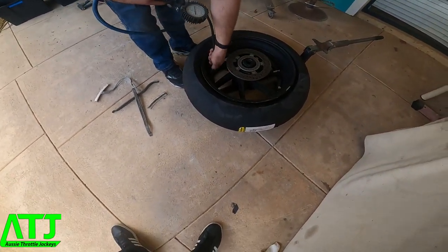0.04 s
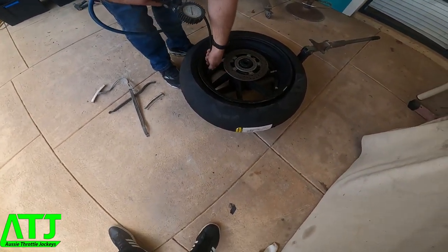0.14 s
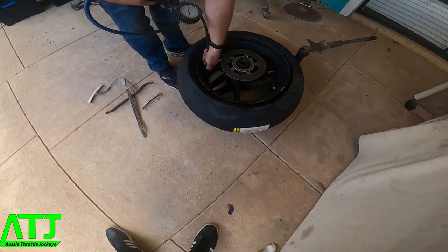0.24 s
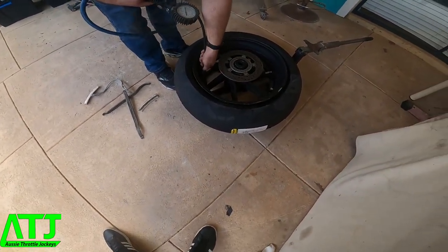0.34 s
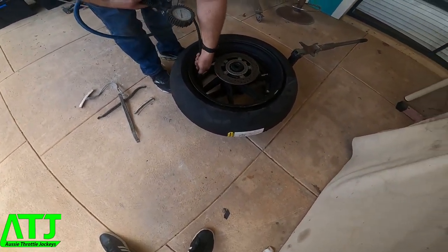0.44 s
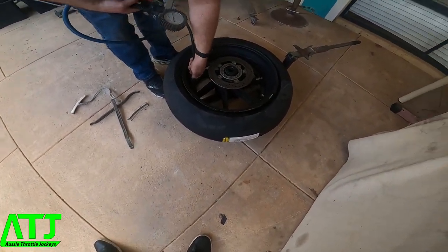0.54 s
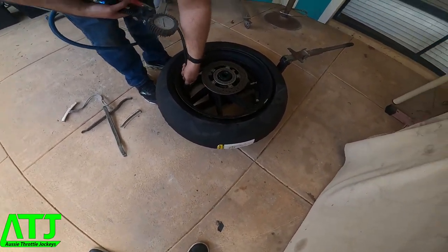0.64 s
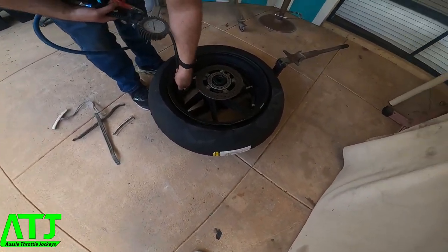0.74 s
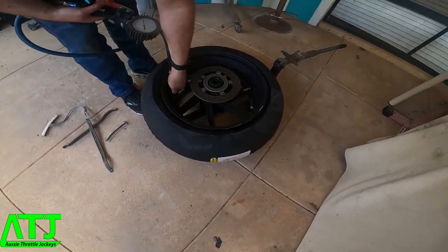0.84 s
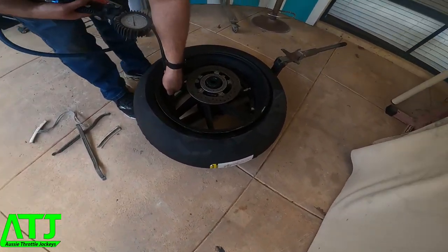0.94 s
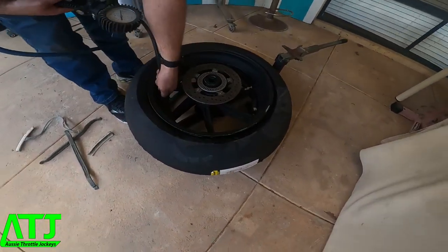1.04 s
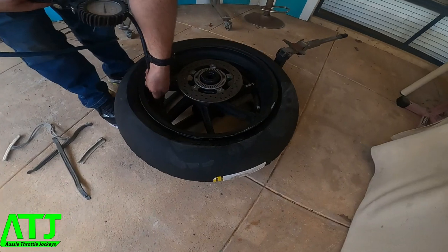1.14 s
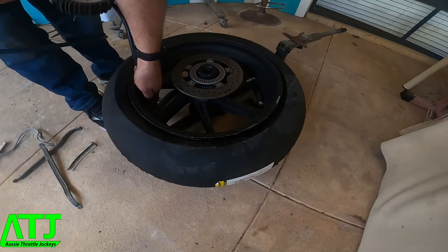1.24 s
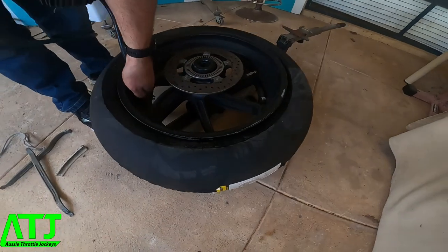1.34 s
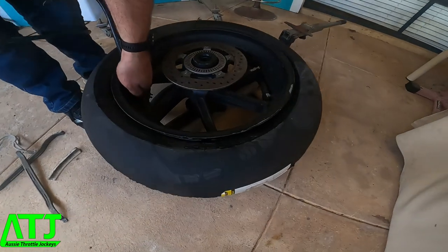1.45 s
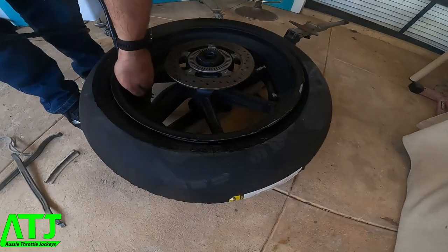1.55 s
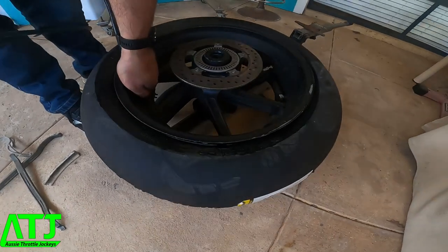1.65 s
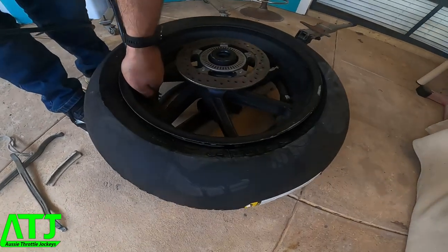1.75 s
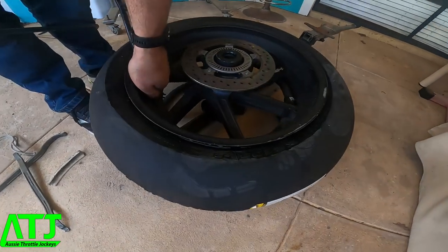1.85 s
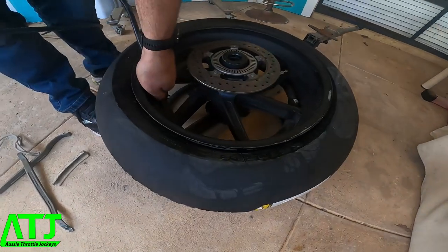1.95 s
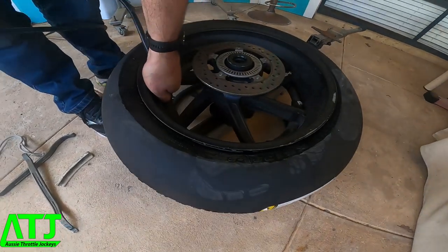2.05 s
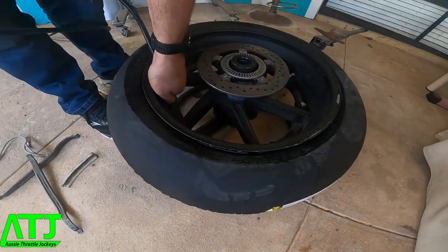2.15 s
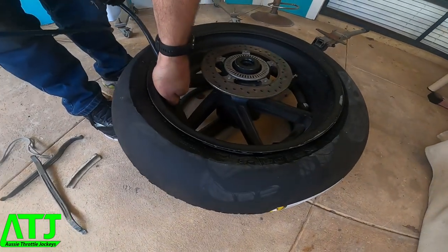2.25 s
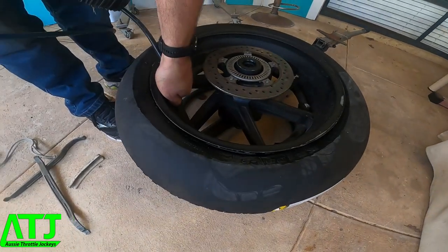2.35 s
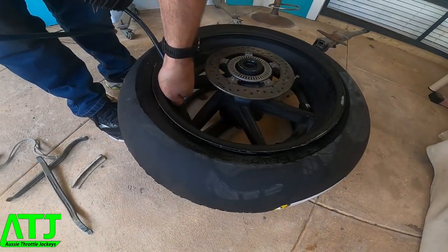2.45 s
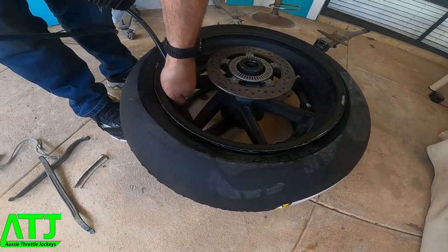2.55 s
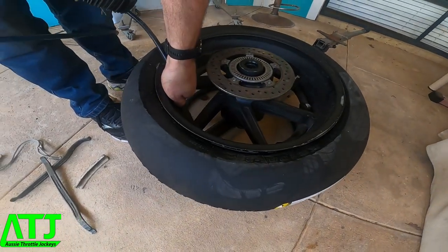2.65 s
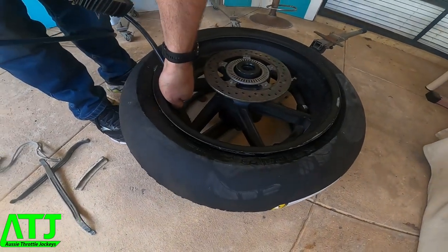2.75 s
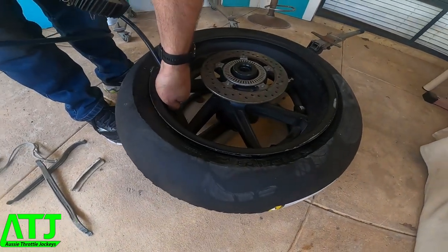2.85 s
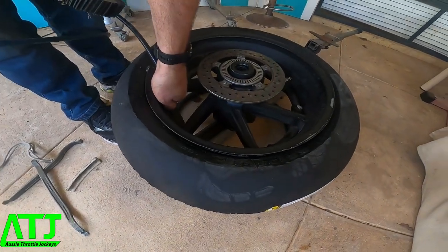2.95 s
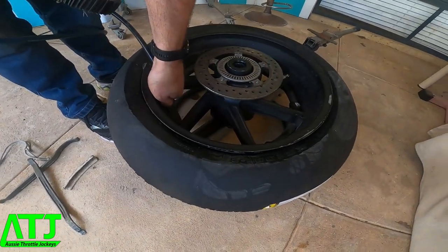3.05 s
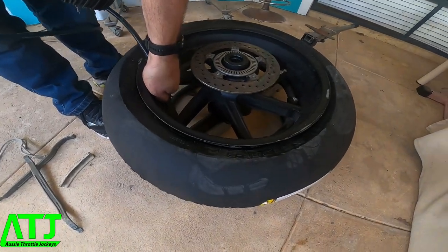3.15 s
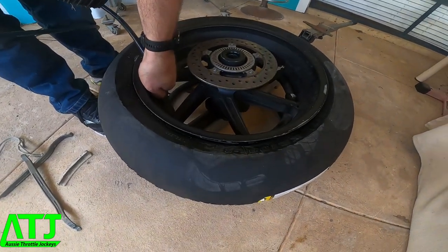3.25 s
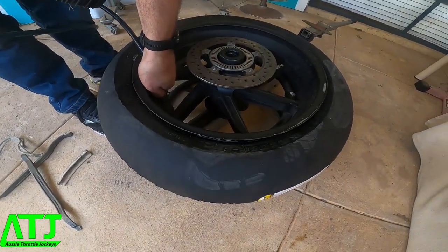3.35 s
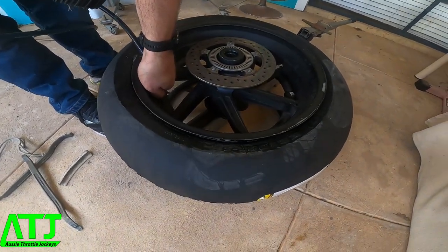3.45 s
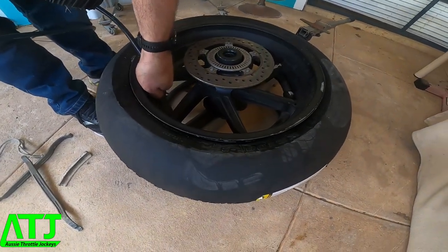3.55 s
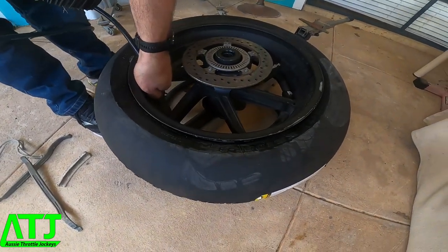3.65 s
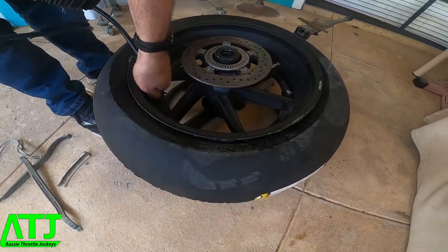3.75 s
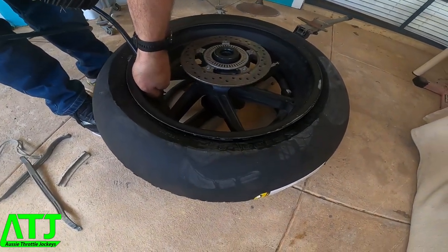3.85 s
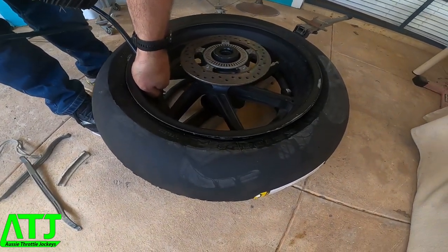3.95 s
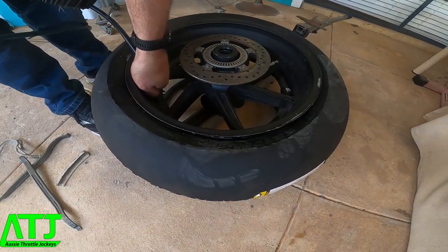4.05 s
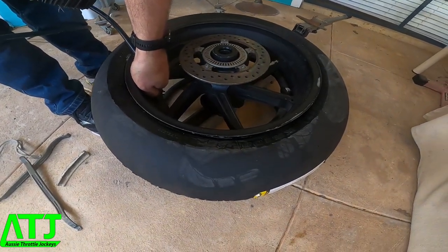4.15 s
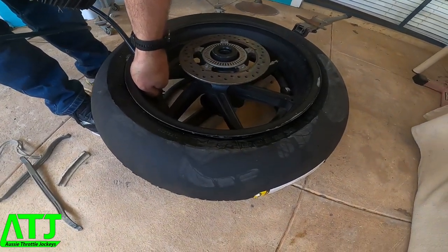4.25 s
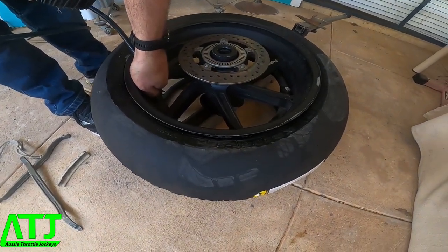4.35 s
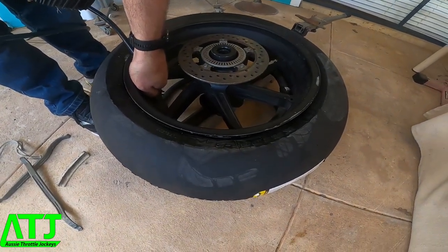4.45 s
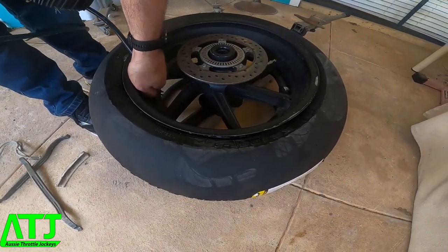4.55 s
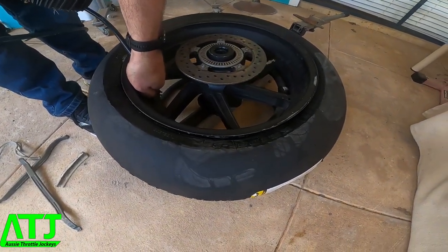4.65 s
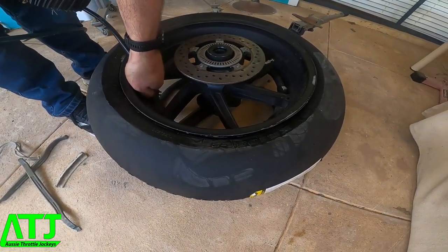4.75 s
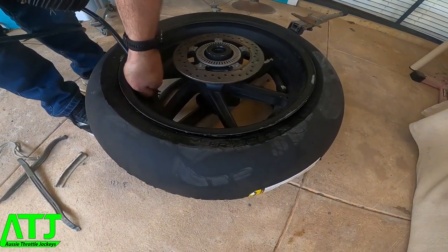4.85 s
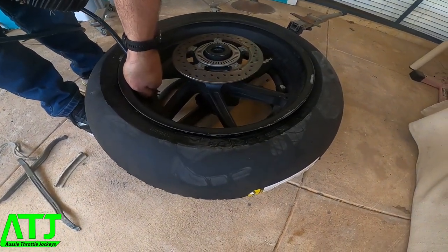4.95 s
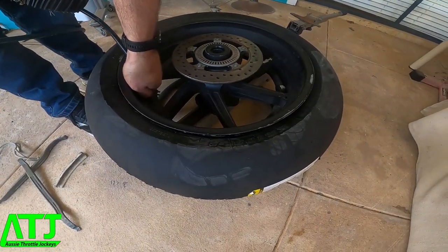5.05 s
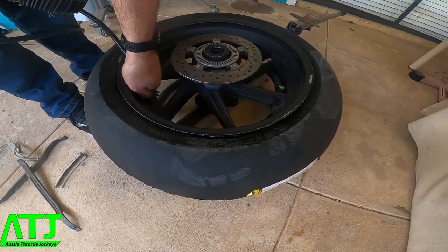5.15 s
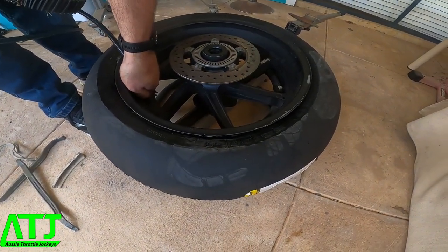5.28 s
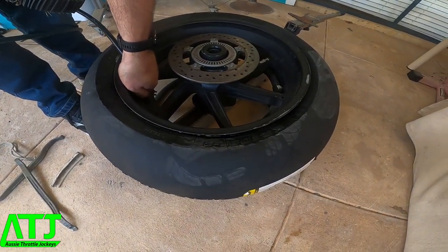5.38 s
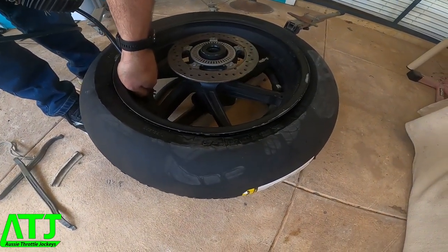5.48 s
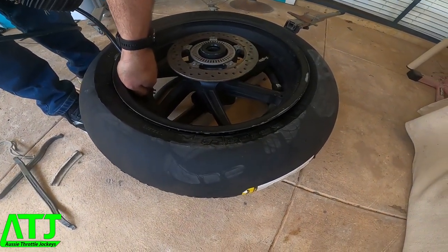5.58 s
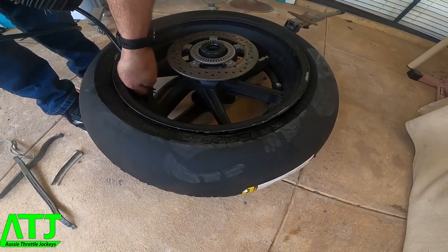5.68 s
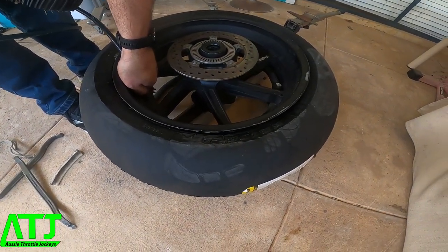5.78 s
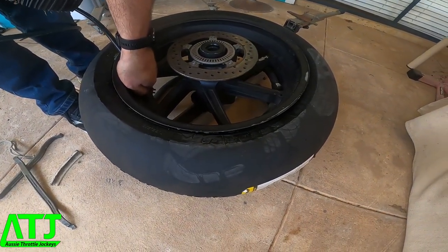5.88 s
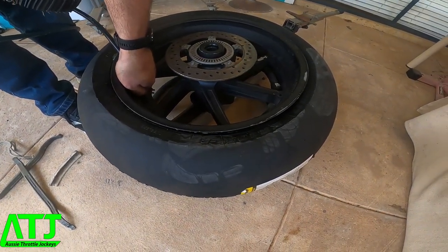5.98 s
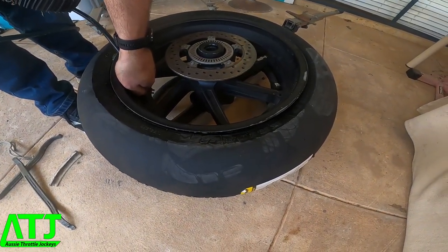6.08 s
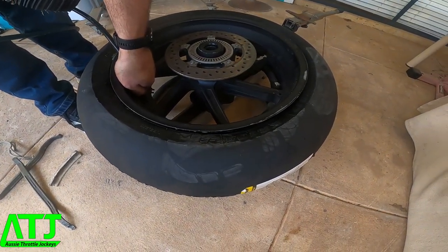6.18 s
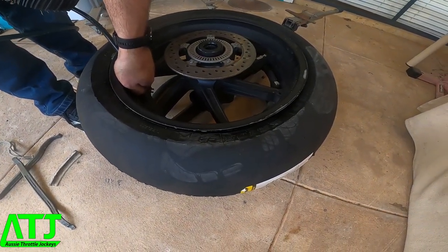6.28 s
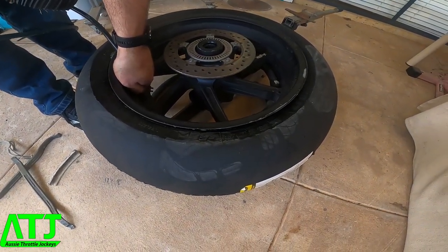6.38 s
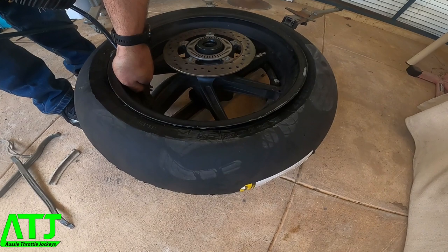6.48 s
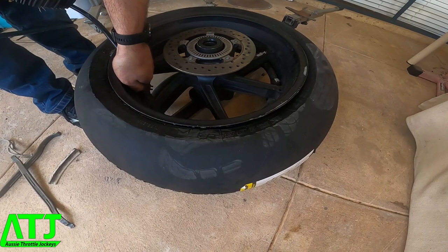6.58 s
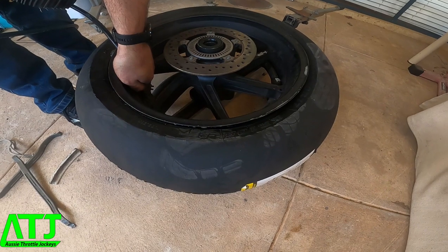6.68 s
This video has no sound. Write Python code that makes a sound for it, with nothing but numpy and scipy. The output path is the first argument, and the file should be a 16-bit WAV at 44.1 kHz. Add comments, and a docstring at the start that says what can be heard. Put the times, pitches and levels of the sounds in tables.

```python
"""Inflating a tyre on a garage floor

A thin hiss dies away, a shoe scuffs, the air chuck clicks and scrapes onto the valve, the wheel is bumped. Then
air rushes in and the bead thumps: turbulent noise at first escapes past the loose bead, then the bead seals and
the jet rings the hollow tyre. Contacts are short bursts that excite decaying modes, and rubs are uneven noise.
A distant motor hums on two wavering harmonics over faint coloured noise of the garage air."""
import sys
import numpy as np
from scipy import signal
from scipy.fft import rfft, irfft
from scipy.io import wavfile
from scipy.ndimage import uniform_filter1d

SR = 44100
rng = np.random.default_rng(int(sys.argv[2]) if len(sys.argv) > 2 else 0)


def wav_record(signal):
    """Record a signal, one row per channel, as 16-bit PCM in the file named by sys.argv[1]."""
    frames = np.transpose(np.atleast_2d(signal))
    bounded = np.clip(frames, -1, 1)
    # unit amplitude maps onto the largest positive 16-bit level
    quanta = np.round(bounded * 32767).astype(np.int16)
    wavfile.write(sys.argv[1], SR, quanta)


N = 296352
# time of every sample [s]; frequency of every spectral bin [Hz], kept above zero for logarithms
T = np.arange(N) / SR
HZ = np.maximum(np.arange(N // 2 + 1) * SR / N, 1)

# Colours give relative spectral density: the noise made from them is scaled to rms 1.
# garage air: pitch_hz [Hz], density_db [dB per Hz]
AIR_COLOUR = [(25, -5), (55, -1.5), (150, -5.5), (300, -15.5), (900, -25), (2500, -16), (4500, -22.5),
              (8000, -28.5), (15000, -53)]
AIR_DB = -55.5
# distant motor: time_s [s], pitch_hz [Hz], level_db [dB]
MOTOR = [(0, 59.7, -59), (.17, 58, -42.5), (.36, 59.7, -60), (.52, 56.8, -45), (.95, 62, -57),
         (1.8, 65, -46), (2.6, 65, -59), (3.5, 58, -60), (6.72, 54, -59)]

# thin hiss at the valve before the chuck is seated: pitch_hz [Hz], density_db [dB per Hz]
SEEP_COLOUR = [(600, -44), (1400, -41), (2100, -33), (3000, -7), (3900, 4), (4600, -2), (5600, -16),
               (8000, -32), (10000, -22), (15000, -38)]
SEEP_DB, SEEP_HOLD_S, SEEP_FADE_DB_PER_S = -49, 0.081, 22

# clothes rustling as the hands move: start_s [s], length_s [s], level_db [dB]
RUSTLES = [(.75, 0.66, -52.5), (1.445, 0.12, -42.5), (1.6, 0.28, -58)]
# colour of the rustle: pitch_hz [Hz], density_db [dB per Hz]
RUSTLE_COLOUR = [(30, 0), (150, -0.5), (350, -4), (600, -14.5), (1200, -10.5), (3000, -14), (14000, -43.5)]
# the hose sliding over a sleeve: start_s [s], length_s [s], level_db [dB]
SLIDES = [(1.29, .165, -53)]
# colour of the slide: pitch_hz [Hz], density_db [dB per Hz]
SLIDE_COLOUR = [(500, -20), (2000, 5), (6000, 2), (9000, -8), (14000, -22)]
# a sole on concrete: start_s [s], length_s [s], level_db [dB]
SCUFFS = [(.467, 0.035, -44)]
# colour of the scuff: pitch_hz [Hz], density_db [dB per Hz]
SCUFF_COLOUR = [(400, -33), (700, -17), (900, -2), (1250, 5.5), (2000, -6), (3300, 1), (5000, -7),
                (7000, -6.5), (13000, -34)]
# the chuck scraping on the rim: start_s [s], length_s [s], level_db [dB]
SCRAPES = [(1.098, 0.026, -33.5), (1.16, 0.058, -36)]
# colour of the scrape: pitch_hz [Hz], density_db [dB per Hz]
SCRAPE_COLOUR = [(120, -42), (200, -19), (248, 13), (280, -1), (602, -17), (860, 7), (1540, 0), (1690, -1),
                 (3500, -7), (7380, -14), (14000, -42)]

# a contact lasts a fixed number of its own cycles
CLICK_CYCLES, THUD_CYCLES, KNOCK_CYCLES = 7, 0.7, 2.2
# metal clicks of the chuck: start_s [s], level_db [dB], centre_hz [Hz],
# spread [band edge over centre], ring_db [dB relative to the click level]
CLICKS = [(.872, -36, 4060, 1.7, -30), (.990, -26.5, 4600, 1.76, -21), (1.005, -14, 3140, 1.68, -19),
          (1.095, -22, 2400, 2, -26), (1.115, -14, 2320, 1.44, -19.5), (1.120, -9, 2550, 1.65, -27),
          (1.1425, -20, 2650, 1.3, -29), (1.162, -21.5, 1880, 1.2, -18), (1.196, -14.5, 2760, 1.18, -31),
          (1.204, -13, 3380, 1.77, -37), (1.209, -12.5, 2170, 1.94, -40), (1.6965, -12, 3070, 2.14, -24.5),
          (1.816, -31, 2910, 1.75, -36)]
# modes of the chuck: pitch_hz [Hz], level_db [dB], t60_s [s]
CHUCK_MODES = [(2290, -12, 0.21), (2860, -4, 0.086), (2840, -7, 0.093), (3000, 0, 0.066), (3060, -18, 0.1),
               (3278, 0.5, 0.12), (3310, 12, 0.036), (3620, -2, 0.12), (4250, -15, 0.11), (4400, -25, 0.15),
               (6500, -11, 0.18)]
# dull bumps on the wheel, the last two being the bead thumping as the air first rushes in: start_s [s],
# level_db [dB], thud_hz [Hz], knock_db [dB relative to the bump level], knock_hz [Hz], ring_db [dB relative to
# the bump level]
BUMPS = [(1.248, -19.5, 137, -32, 880, -36), (1.305, -30, 89, -30, 900, -38),
         (1.459, -15, 204, -9, 980, -18), (1.482, -13, 278, -12, 846, -27),
         (1.492, -22, 87.5, -23, 850, -23), (1.511, -17, 175, 2.5, 1370, -18),
         (1.525, -25, 39.8, -35, 900, -37), (1.539, -12.5, 300, -7, 880, -15),
         (1.696, -32, 116, 8, 1210, -23), (2.041, -22, 127, -30, 910, -36),
         (2.061, -16, 58.4, -33, 900, -36)]
# modes of the wheel: pitch_hz [Hz], level_db [dB], t60_s [s]
WHEEL_MODES = [(78.6, 5.5, 0.54), (167, -15, 0.28), (239, -15, 0.95), (318, 2, 0.17), (388.7, -9, 0.37),
               (970, -30, 0.088), (1080, -29, 0.11), (1450, -28, .12), (1782, -30, .12)]

# first spurt of air: pitch_hz [Hz], density_db [dB per Hz]
SPURT_COLOUR = [(120, -45), (200, -15), (842, -26), (1620, -11.5), (1980, -16), (2650, -6), (6020, -3),
                (12000, -16), (15500, -28)]
VALVE_OPEN_S, SPURT_S, SPURT_DB = 2.038, 0.03, -19
# air escaping through the wide bead gap: pitch_hz [Hz], density_db [dB per Hz]
ESCAPE_COLOUR = [(150, -14), (500, -9.5), (800, -18), (1400, -12.5), (2200, -13), (3000, -7.5), (3400, 1.5),
                 (4600, -0.5), (6500, -2), (8500, -7), (10500, -17.5), (12500, -15.5), (15000, -27)]
# hiss of the pinched gap: pitch_hz [Hz], density_db [dB per Hz]
PINCHED_COLOUR = [(150, -31), (800, -15.5), (1300, -14), (2000, -11.5), (3300, 3.5), (4400, 4), (6000, -2),
                  (8000, -24), (15000, -60)]
# the jet heard through the tyre wall: pitch_hz [Hz], density_db [dB per Hz]
JET_COLOUR = [(150, -25.5), (800, -23), (1200, -19.5), (1400, -10.5), (2200, -8), (2500, -5.5), (3050, -5),
              (3300, 2.5), (4400, -3.5), (5000, 0), (7500, 0), (9000, -8.5), (12000, -15.5), (15000, -24.5)]
# resonances of the gap at the bead: pitch_hz [Hz], width_hz [Hz], level_db [dB over the hiss]
GAP_MODES = [(1377, 10, 16), (1810, 31, 13.5), (2325, 22, 14), (2740, 36, 13), (3330, 63, 11),
             (3635, 10, 18), (4310, 22, 17.5), (5220, 390, 11.5), (6120, 180, 16), (6470, 400, 14),
             (7080, 65, 12), (7540, 110, 16.5)]
# strongest air modes of the tyre: pitch_hz [Hz], width_hz [Hz], level_db [dB over the hiss]
CAVITY_MODES = [(625, 63, 1), (1073, 9.2, 1.5), (1342.4, 21, 15.5), (1727, 38, 6), (1816, 16, 14.5),
                (1925, 25, 2), (2323, 15, 16.5), (2373, 24.4, 12), (2576, 9.4, 13), (2679, 7.8, 13.5),
                (3195, 41, 14.5), (3280, 77, 8.5), (3460, 12, 11), (3514, 29, 11), (3685, 16, 13),
                (3930, 14, 9), (4736, 63, 16), (4590, 23, 9.5), (4840, 20, 12), (4885, 11.6, 16.5),
                (5060, 28, 10), (5779, 6.3, -1.5), (6273, 27, 15.5), (6810, 16, 11.5), (7520, 70, 10),
                (7700, 106, 10.5), (9140, 270, 5.5), (10500, 230, 6), (11870, 170, 7)]
# standing waves across the tyre's section: pitch_hz [Hz]
ACROSS_HZ = [0, 1336, 2334]
ROUND_HZ = 213  # lowest wave round the ring
# air flow: it builds up, surges, then sags as the tyre fills; the treble share follows the level
FLOW_DB, SAG_DB_PER_S = -23, 1.03
BUILD_DB, BUILD_S, SURGE_DB, SURGE_S = 11, 0.058, 8.5, 0.16
TREBLE_DB, TREBLE_DB_PER_DB = -4, 0.55
# the bead: when its gap narrows and when it seals, with the time scale of each step
NARROW_S, NARROWING_S, SEAL_S, SEALING_S = 2.48, 0.16, 3.23, 0.16
# shares of the power: the wide gap at first, while narrowed and once sealed; the pinched gap
WIDE_SHARE, NARROWED_SHARE, SEALED_SHARE, PINCHED_SHARE = 0.86, 0.21, 0.056, 0.3

# stereo width: pitch_hz [Hz], level_db [dB, side minus mid]
WIDTH = [(60, -8.5), (300, -9), (700, -10.5), (3000, -8.5), (6500, -16.5), (7300, -22), (8200, -6),
         (9000, -25), (15000, -7)]
# stereo balance: pitch_hz [Hz], level_db [dB, left minus right]
BALANCE = [(100, .5), (1200, 0.5), (2500, 2.5), (5000, 0.9), (7900, 0.7), (8500, -5.5), (15000, -6.5)]
TOP_HZ = 15200


def amp(db):
    """Level law: an amplitude gain is ten to the power of decibels over twenty."""
    return 10 ** (np.asarray(db) / 20)


def unit(x):
    """Normalisation: division by the root mean square gives rms 1."""
    return x / np.sqrt(np.mean(x ** 2))


def curves(rows):
    """Linear interpolation: the columns of a time table at every sample."""
    s, *columns = np.transpose(rows)
    return [np.interp(T, s, column) for column in columns]


def colour(points):
    """Spectral envelope: decibels interpolated over log frequency, as gain in every bin."""
    hz, db = np.transpose(points)
    return amp(np.interp(np.log(HZ), np.log(hz), db))


def shape(x, gain):
    """Linear filtering: the spectrum is multiplied by a gain at every frequency."""
    return irfft(rfft(x) * gain, N)


def noise(gain):
    """Coloured noise: white Gaussian noise filtered by a gain and scaled to rms 1."""
    return unit(shape(rng.standard_normal(N), gain))


def walk(rate_hz):
    """Slow random modulation: low-passed noise of spread 1."""
    return noise(1 / (1 + (HZ / rate_hz) ** 4))


def ports(mid, other):
    """Mid-side stereo: two ports share one sound and take a diffuse sound in opposite sign."""
    side = shape(other, colour(WIDTH))
    return np.array([mid + side, mid - side])


def garage_air():
    """Diffuse background: faint coloured noise with a slowly wandering level."""
    level = amp(AIR_DB + walk(0.6))
    return level * ports(noise(colour(AIR_COLOUR)), noise(colour(AIR_COLOUR)))


def motor(second_db=-3, waver_db=2.0):
    """Periodic source: a far motor hums on its turning rate and the octave above."""
    hz, db = curves(MOTOR)
    wavering_hz = hz * (1 + 0.021 * walk(7.6))
    phase = 2 * np.pi * np.cumsum(wavering_hz) / SR
    first = np.sin(phase) * amp(waver_db * walk(5.5))
    second = np.sin(2 * phase) * amp(second_db + waver_db * walk(2.3))
    return amp(db) * (first + second)


def garage(x, t60=0.28, dull_hz=3800, thin_hz=400):
    """Reverberation: convolution with a decaying diffuse tail, duller and thinner than the direct sound."""
    dulling = 1 + (HZ / dull_hz) ** 2
    thinning = 1 + (thin_hz / HZ) ** 4
    tail = noise(1 / np.sqrt(dulling * thinning)) * amp(-60 * T / t60) * (T > 0.003)
    return signal.fftconvolve(x, tail[:SR] / np.sqrt(np.sum(tail ** 2)))[:N]


def seep():
    """Turbulent leak: a thin hiss holds briefly and fades exponentially."""
    fade_db = SEEP_FADE_DB_PER_S * np.maximum(T - SEEP_HOLD_S, 0)
    return noise(colour(SEEP_COLOUR)) * amp(SEEP_DB - fade_db)


def friction(strokes, points, rise_share, t60, grain_db):
    """Stick-slip friction: dense uneven slips make a gritty rub that rises, holds and dies away."""
    level = 0
    for s, length, db in strokes:
        decay_db = 60 * np.maximum(T - s - length, 0) / t60
        rise = np.clip((T - s) / (rise_share * length), 0, 1)
        level = level + amp(db - decay_db) * rise
    return unit(noise(colour(points)) * amp(grain_db * walk(160))) * level


def rubs():
    """Sliding contacts: rustling clothes, the hose on a sleeve, a sole and the chuck on the rim."""
    rustle = friction(RUSTLES, RUSTLE_COLOUR, rise_share=0.17, t60=0.22, grain_db=4.0)
    slide = friction(SLIDES, SLIDE_COLOUR, rise_share=0.33, t60=0.15, grain_db=1.0)
    scuff = friction(SCUFFS, SCUFF_COLOUR, rise_share=0.09, t60=0.14, grain_db=2)
    scrape = friction(SCRAPES, SCRAPE_COLOUR, rise_share=0.28, t60=0.12, grain_db=3.5)
    return rustle + slide + scuff + scrape


def blows(rows, modes, cycles, push_db, grit_db, attack_s=0.00045, order=3):
    """Impact excitation: a contact makes a short push and a burst of grit, and the struck part rings on."""
    out, t = np.zeros(N + SR), T[:SR]
    attack = 1 - np.exp(-t / attack_s)
    for s, db, hz, spread, ring_db in rows:
        length, spread = cycles / hz, max(spread, 1.1)
        edges = [hz / spread, min(hz * spread, SR / 2 - 1)]
        band = signal.butter(order, edges, "band", fs=SR, output="sos")
        grit = signal.sosfilt(band, rng.standard_normal(SR) * np.exp(-t / length))
        grit /= np.sqrt(np.sum(grit ** 2) / (length * SR))
        push = np.sin(2 * np.pi * hz * t) * t / length * np.exp(1 - t / length)
        # each mode is struck a little differently: 1 dB of chance
        ring = sum(amp(mode_db + rng.normal(0, 1)) * np.sin(2 * np.pi * mode_hz * t) * amp(-60 * t / t60)
                   for mode_hz, mode_db, t60 in modes)
        contact = amp(push_db) * push + amp(grit_db) * grit + amp(ring_db) * ring
        out[int(s * SR):][:SR] += amp(db) * attack * contact
    return out[:N]


def clicks():
    """Modal impact: short metal contacts ring the air chuck."""
    return blows(CLICKS, CHUCK_MODES, CLICK_CYCLES, push_db=-17, grit_db=-8.5)


def bumps(thud_spread=1.53, knock_spread=1.45):
    """Modal impact: a soft thud rings the wheel, joined by a short hard knock."""
    thuds = [(s, db, hz, thud_spread, ring_db) for s, db, hz, _, _, ring_db in BUMPS]
    knocks = [(s, db + knock_db, hz, knock_spread, 0) for s, db, _, knock_db, hz, _ in BUMPS]
    soft = blows(thuds, WHEEL_MODES, THUD_CYCLES, push_db=-6.5, grit_db=-9)
    hard = blows(knocks, [], KNOCK_CYCLES, push_db=-7.5, grit_db=-8)
    return soft + hard


def resonances(modes):
    """Resonance: the power of peaks adds to a flat bed, giving one gain curve."""
    peaks = sum(amp(db) ** 2 / (1 + (2 * (HZ - hz) / width) ** 2) ** 2.42 for hz, width, db in modes)
    return np.sqrt(1 + peaks)


def ring_modes(width_hz=22, depth=3.4, count=10):
    """Cavity modes: each wave across the tyre carries a ladder of waves that run round it."""
    hz = np.hypot(np.array(ACROSS_HZ)[:, None], ROUND_HZ * np.arange(1, count)).ravel()
    grid = np.arange(0, SR / 2, 2)
    ladder = np.sum(1 / (1 + (2 * (grid[:, None] - hz) / width_hz) ** 2), axis=1)
    power = 1 + depth ** 2 * ladder
    # dividing by the local mean over 400 Hz leaves the broad colour as it was
    return np.interp(HZ, grid, np.sqrt(power / uniform_filter1d(power, size=200)))


def random_ripple(memory_s):
    """Modal overlap: the spectrum of a decaying noise burst is an irregular ripple, rms 1."""
    return unit(rfft(rng.standard_normal(N) * np.exp(-T / memory_s)).real)


def crowded_modes(ripple_db=4.5, from_hz=8200):
    """Modal density: in the top octave the modes crowd together into an irregular fine ripple."""
    return amp(ripple_db * random_ripple(0.02) / (1 + (from_hz / HZ) ** 10))


def step_down(at_s, takes_s):
    """Smooth transition: a hyperbolic tangent falls from 1 to 0."""
    return 0.5 - 0.5 * np.tanh((T - at_s) / takes_s)


def flow():
    """Filling a vessel: the level in dB builds, surges and relaxes, then sags as tyre pressure rises."""
    age = np.maximum(T - VALVE_OPEN_S - SPURT_S, 0)
    build_db = -BUILD_DB * np.exp(-age / BUILD_S)
    surge_db = SURGE_DB * np.exp(-age / SURGE_S)
    return FLOW_DB + build_db + surge_db - SAG_DB_PER_S * age


def bead():
    """Power division: shares through the wide and the pinched gap, as the bead narrows and then seals."""
    loose = step_down(NARROW_S, NARROWING_S)
    unsealed = step_down(SEAL_S, SEALING_S)
    wide = SEALED_SHARE + (NARROWED_SHARE - SEALED_SHARE) * unsealed
    wide = wide + (WIDE_SHARE - NARROWED_SHARE) * loose
    pinched = PINCHED_SHARE * (1 - loose) * unsealed
    return np.clip([wide, pinched], 0, 1)


def shifting(pair, depth=0.099, rate_hz=1, memory_s=0.0077, count=3):
    """Slow modal change: as hand and jet move a little, neighbouring resonances trade strength."""
    out = pair
    for _ in range(count):
        ripple = random_ripple(memory_s)
        out = out + depth * walk(rate_hz) * shape(pair, ripple)
    return out / np.sqrt(1 + count * depth ** 2)


def inflation(flutter_db=0.1, swell_db=0.43, split_hz=7000):
    """Turbulent jet noise: air sounds the bead gap, then the pinched gap, and rings the hollow tyre."""
    flow_db = flow()
    treble_db = TREBLE_DB + TREBLE_DB_PER_DB * (flow_db - FLOW_DB)
    wide, pinched = bead()
    sealed = np.clip(1 - wide - pinched, 0, 1)
    treble, ripple = 1 / (1 + (split_hz / HZ) ** 20), crowded_modes()
    paths = [(wide, colour(ESCAPE_COLOUR) * resonances(GAP_MODES)),
             (pinched, colour(PINCHED_COLOUR)),
             (sealed, colour(JET_COLOUR) * resonances(CAVITY_MODES) * ring_modes())]
    opened = np.clip((T - VALVE_OPEN_S) / 0.0033, 0, 1) ** 2
    # the pressure stored in the hose leaves in one spurt before the steady flow builds
    steady = np.clip((T - VALVE_OPEN_S - SPURT_S) / 0.0073, 0, 1)
    pair = []
    for _ in range(2):  # the shared and the diffuse sound
        hiss = 0
        for share, gain in paths:
            low = noise(gain * (1 - treble))
            high = amp(treble_db) * noise(gain * treble * ripple)
            hiss = hiss + np.sqrt(share) * (low + high)
        spurt = amp(SPURT_DB) * noise(colour(SPURT_COLOUR))
        pair.append(steady * amp(flow_db) * hiss + (1 - steady) * spurt)
    unsteadiness = amp(flutter_db * walk(23) + swell_db * walk(3.3))
    return shifting(ports(*pair)) * opened * unsteadiness


def scene(room_db=-8, diffuse_db=-2):
    """Superposition: background, reverberant handling sounds and bead thumps, and the inrushing air add
    linearly."""
    background = garage_air() + motor()
    handling = seep() + rubs() + clicks() + bumps()
    near = ports(handling + amp(room_db) * garage(handling), amp(diffuse_db) * garage(handling))
    return background + near + inflation()


def record(dry, lag_s=0.000032, lag_top_hz=6800):
    """Interaural-style cues: the right port leads and is brighter at the top; the highest treble is cut."""
    # half the lag and half the balance go to each port, in opposite sense
    late = np.exp(-1j * np.pi * HZ * lag_s / (1 + (HZ / lag_top_hz) ** 20))
    tilt = np.sqrt(colour(BALANCE)) * late
    heard = np.array([shape(dry[0], tilt), shape(dry[1], 1 / tilt)])
    low_pass = signal.ellip(10, 0.2, 80, TOP_HZ, fs=SR, output="sos")
    return signal.sosfilt(low_pass, heard)


dry = scene()
out = record(dry)
wav_record(out)
```